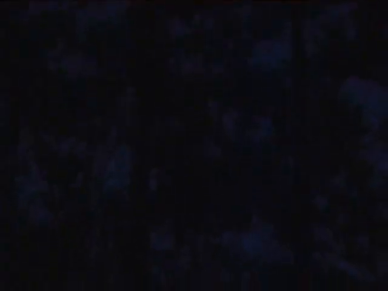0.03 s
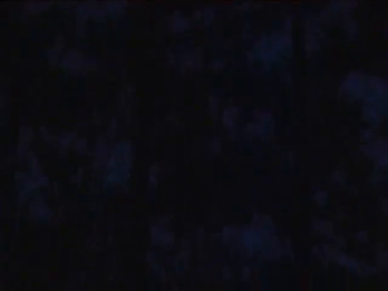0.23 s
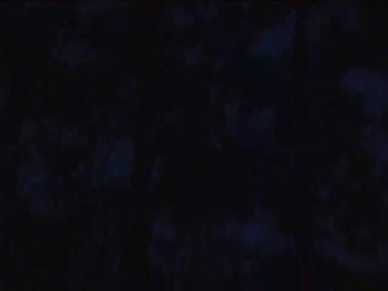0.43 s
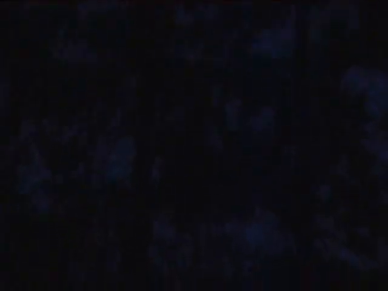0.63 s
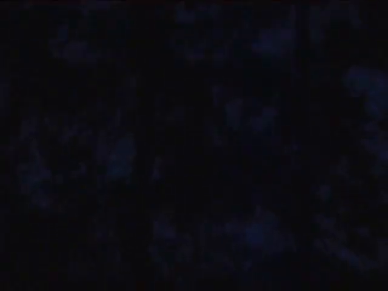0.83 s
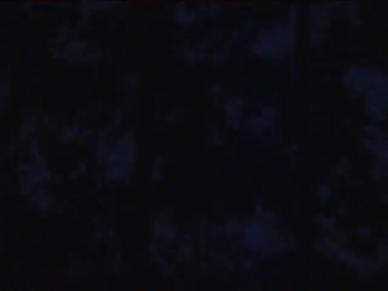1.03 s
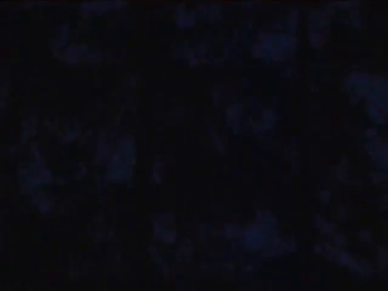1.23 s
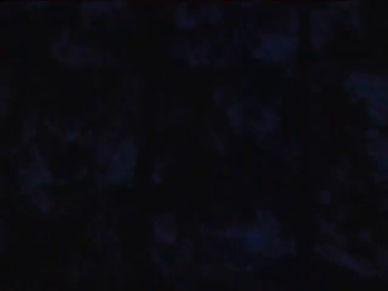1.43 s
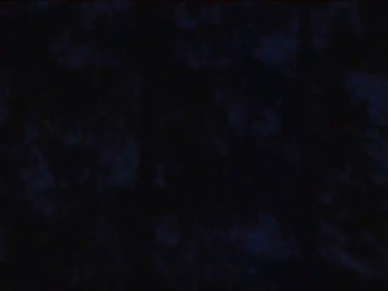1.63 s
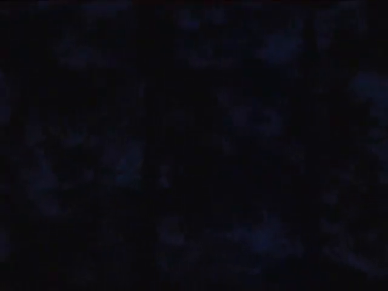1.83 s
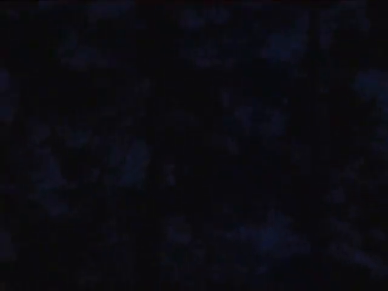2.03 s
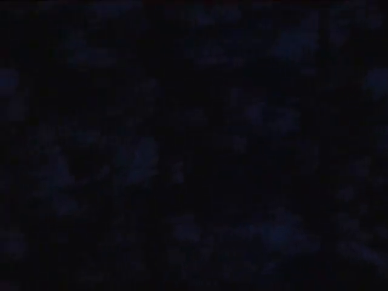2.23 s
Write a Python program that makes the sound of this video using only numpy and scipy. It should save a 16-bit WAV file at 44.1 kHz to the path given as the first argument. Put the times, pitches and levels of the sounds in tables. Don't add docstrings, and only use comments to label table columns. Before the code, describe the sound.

A tawny owl gives one quick, sharp kee-wick right at the start, breaking upward into its second note; a short woodland echo follows, then quiet night air with faint traffic drone, heard in stereo outdoors.

```python
import sys
import numpy as np
from scipy import signal
from scipy.io import wavfile
from scipy.ndimage import uniform_filter1d

SR = 44100
rng = np.random.default_rng(int(sys.argv[2]) if len(sys.argv) > 2 else 0)


def to_wav(sig):
    pcm = np.clip(np.atleast_2d(sig), -1, 1) * 32767
    pcm = np.round(pcm).astype(np.int16)
    wavfile.write(sys.argv[1], SR, pcm.T)


def elevation(decibels):
    levels = np.asarray(decibels, float)
    return 10 ** (levels / 20)


N = 101430


def rms_one(x):
    return x / np.sqrt(np.mean(x ** 2) + 1e-20)


def in_time(s, values):
    return np.interp(np.arange(N) / SR, s, values)


def at_hz(points, hz):
    points_hz, values = np.array(points).T
    return np.interp(np.log(hz), np.log(points_hz), values)


def drift(rate_hz):
    r = np.exp(-2 * np.pi * rate_hz / SR)
    return rms_one(signal.lfilter([1], [1, -2 * r, r * r], rng.standard_normal(N + SR))[SR:])


def resonate(x, hz, width_hz):
    r = np.exp(-np.pi * width_hz / SR)
    rise = np.array([1, 0, -1]) * (1 - r * r) / 2
    return signal.lfilter(rise, [1, -2 * r * np.cos(2 * np.pi * hz / SR), r * r], x)


def band(x, low_hz, high_hz):
    return signal.sosfilt(signal.butter(2, [low_hz, high_hz], "band", fs=SR, output="sos"), x)


def lean(left_db):
    return elevation(left_db * np.array([[1], [-1]]))


def spread(shared, apart, alike):
    return np.sqrt(1 + alike) * shared + np.sqrt(1 - alike) * apart * [[1], [-1]]


def owl():
    # time_s, pitch_hz, effort_db, lowest_partial_db, third_partial_and_up_db
    kee = [
        (.117, 1169, -43, -11, -3),
        (.123, 1200, -48, -9, -10),
        (.133, 1246, -38.5, -1, 1.5),
        (.146, 1211, -43.5, -11, -3),
        (.165, 1148, -49, 7, 8),
        (.205, 1069, -44.5, -3.5, -5),
        (.235, 1090, -45.5, 4, 4.8),
        (.268, 1200, -38, 1, 0),
        (.2895, 1258, -34, -7, 1),
    ]
    # time_s, pitch_hz, effort_db, lowest_partial_db, third_partial_and_up_db
    wick = [
        (.294, 1523, -36, -6, 7.4),
        (.3, 1555, -28, -1.2, -6),
        (.317, 1605, -37, -16, 4.5),
        (.334, 1633, -35, 3.5, 2.5),
        (.348, 1629, -40.5, -3.5, 6.5),
        (.36, 1597, -28, -16, -5.5),
        (.373, 1547, -28, 3.5, -3),
        (.387, 1400, -38, -21, -6),
        (.394, 1328, -44, -13, -13),
    ]
    # multiple_of_pitch, level_db
    kee_partials = [(1, -10.5), (2, -1), (3, -9), (4, -12.5), (5, -16.5), (6, -21), (7, -20)]
    # multiple_of_pitch, level_db
    wick_partials = [(1, -9), (2, -0.5), (3, -8), (4, -20), (5, -25), (.5, -32), (1.5, -28), (2.5, -31.5),
                     (3.5, -31.5)]
    # multiple_of_pitch, multiple_of_second_voice, level_db
    mixing_tones = [(2, 1, -25), (3, 1, -31), (1, 1, -42), (2, 2, -31), (3, 2, -32), (2, 3, -33),
                    (-2, 1, -26), (3, -1, -28), (-2, 2, -36), (-3, 2, -32), (4, 1, -35.5), (4, 2, -38)]
    # centre_s, half_length_s, rise_db
    rasps = [
        (0.267, 0.0079, 8),
        (0.29, 0.0024, 14),
        (0.37, .01, -19),
    ]
    attack_s, break_s, break_lasts_s = 0.0018, .292, 0.0043
    second_voice_hz, jitter, shimmer_db = 3946, .0009, 1.5
    throat_top_hz, throat_fall_db_per_khz = 7200, 8

    s, hz, effort_db, low_db, bright_db = np.transpose(list(kee) + list(wick))
    pitch = uniform_filter1d(in_time(s, hz), size=40)
    low_db, bright_db = in_time(s, low_db), in_time(s, bright_db)
    phase = 2 * np.pi * np.cumsum(pitch * (1 + jitter * drift(250))) / SR
    second = 2 * np.pi * np.cumsum(second_voice_hz * (1 + 2 * jitter * drift(180))) / SR
    broken = in_time([break_s - break_lasts_s / 2, break_s + break_lasts_s / 2], [0, 1])

    def stack(partials):
        total = 0
        for k, db in partials:
            k = round(2 * k) / 2
            throat_db = throat_fall_db_per_khz * np.maximum(k * pitch - throat_top_hz, 0) / 1e3
            beak_db = (k == 1) * low_db + (k >= 3) * bright_db
            total = total + elevation(db + shimmer_db * drift(47) + beak_db - throat_db) * np.sin(k * phase)
        return total

    mixing = 0
    for k, m, db in mixing_tones:
        tone = np.sin(round(k) * phase + round(m) * second)
        mixing = mixing + elevation(db + 2 * shimmer_db * drift(65)) * tone

    t = np.arange(N) / SR
    flare_db = sum(db * np.exp(-((t - at) / half) ** 2) for at, half, db in rasps)
    hiss = rms_one(resonate(rng.standard_normal(N), 4960, 10000))
    breath = elevation(-30 + flare_db) * hiss * (1 + np.sin(phase))

    sounding = in_time([s[0] - attack_s, s[0], s[-1], s[-1] + attack_s], [0, 1, 1, 0])
    effort = elevation(uniform_filter1d(in_time(s, effort_db), size=100))
    voice = (1 - broken) * stack(kee_partials) + broken * (stack(wick_partials) + mixing) + breath
    return sounding * effort * 1.327 * voice


def wood(x):
    # delay_s, level_db, left_lean_db
    echoes = [
        (.0043, -18, -3),
        (0.01, -11.5, -5),
        (.023, -14.5, 1),
        (.078, -21, 0.5),
    ]
    # low_hz, high_hz, level_db, t60_s
    tail_bands = [(1000, 2310, 3, 0.84), (2260, 4400, 3.1, 0.45), (4000, 6200, -3, 0.44),
                  (6300, 15000, -2, .22)]
    tail_rise_s, tail_alike = 0.0028, 0.78
    near = x
    for delay_s, db, left_db in echoes:
        delayed = np.interp(np.arange(N) - delay_s * SR, np.arange(N), x)
        near = near + elevation(db) * lean(left_db) * delayed

    t = np.arange(SR) / SR
    shared, apart = rng.standard_normal((2, SR))
    white = spread(shared, apart, tail_alike) * (1 - np.exp(-t / tail_rise_s))
    tail = 0
    for low_hz, high_hz, db, t60 in tail_bands:
        dying = elevation(db - 60 * t / t60) / np.sqrt(t60 * SR / 14)
        tail = tail + dying * band(white, low_hz, high_hz)
    tail = tail * elevation(-9.5) * lean(-1.3)
    return near * lean(-1.5) + signal.fftconvolve(x[None], tail, axes=1)[:, :N]


def twigs():
    # start_s, peak_db
    ticks = [
        (0.7724, -48),
        (0.9247, -45.5),
        (1.691, -45.5),
    ]
    # mode_hz, level_db, t60_s
    modes = [(1850, -1, 0.0066), (2530, -2.5, 0.009), (3990, 0, 0.003), (5400, -8, 0.0029)]
    out = np.zeros(N)
    for hz, level_db, t60 in modes:
        clicks = np.zeros(N) + 1e-18
        for s, db in ticks:
            for after_s, loss_db in [(0, -1.5), (.0021, -5.5), (.0046, -7)]:
                clicks[int((s + after_s) * SR)] = elevation(db + level_db + loss_db + rng.normal(0, 1.7))
        r, w = elevation(-60 / (t60 * SR)), 2 * np.pi * hz / SR
        out += signal.lfilter([0, np.sin(w)], [1, -2 * r * np.cos(w), r * r], clicks)
    return out * lean(-.5)


def hum():
    # line_hz, level_db
    lines = [(98.4, -63.5), (197.3, -67.5), (52, -74)]
    waver_db, waver_hz = 1.2, 2.5
    out = 0
    for hz, db in lines:
        level = elevation(db + waver_db * drift(7.2))
        out = out + level * np.sin(2 * np.pi * np.cumsum(hz + waver_hz * drift(4.5)) / SR)
    return out * lean(-1.4)


def sides(pair, hz):
    # band_hz, likeness (0 to 1)
    likeness = [(25, 1), (60, 1), (180, 0.8), (550, 0.61), (1650, 0.17), (4970, 0.19), (15000, 0.52)]
    # band_hz, difference_db
    left_over_right = [(60, -2.5), (240, -2.5), (950, -2), (3770, 0), (15000, 0.0)]
    alike = np.clip(at_hz(likeness, hz), -1, 1)
    return spread(pair[0], pair[1], alike) * lean(at_hz(left_over_right, hz) / 2)


def night():
    # band_hz, level_db (per Hz)
    floor = [(15, -49), (25, -26.5), (99, -6.5), (160, -6.5), (193, -7), (598, -6.5), (895, -9.5),
             (1620, -16), (15500, -30.5)]
    # time_s, level_db
    swell = [(0, 1), (.5, 0.46), (1.2, 1.3), (1.7, 1.2), (2.3, 1.8)]
    # centre_hz, width_hz, level_db
    drones = [(100.2, 34, -64.5), (196.5, 12.4, -72.5), (51.3, 18, -74), (872, 470, -58.5),
              (2620, 430, -72), (2166, 90, -75)]
    patchy_db = .5
    white = rng.standard_normal((2, 2, N + SR))
    swell_db = in_time(*np.transpose(swell))
    edges = 22 * 2 ** np.arange(0, 9.6, .5)
    out = 0
    for k, (low, high) in enumerate(zip(edges, edges[1:])):
        pair = band(white[k % 2], low, high)[:, SR:]
        hz = np.sqrt(low * high)
        band_db = at_hz(floor, hz) + patchy_db * drift(16.5) + swell_db * (hz < 2000)
        out = out + elevation(band_db) * sides(pair, hz)
    out = elevation(-53.5) * rms_one(out)
    for hz, width_hz, db in drones:
        noise = rng.standard_normal((2, N + SR))
        pair = resonate(resonate(noise, hz, width_hz), hz, width_hz)[:, SR:]
        out = out + elevation(db + swell_db) * sides(rms_one(pair), hz) * 0.81
    return out


def scene():
    return wood(owl()) + night() + hum() + twigs()


def roll_off(x):
    return signal.sosfilt(signal.butter(12, 15680, fs=SR, output="sos"), x)


def record(dry):
    mix = signal.sosfilt(signal.cheby2(14, 60, 15900, fs=SR, output="sos"), dry)
    return roll_off(mix)


dry = scene()
out = record(dry)
to_wav(out)
```